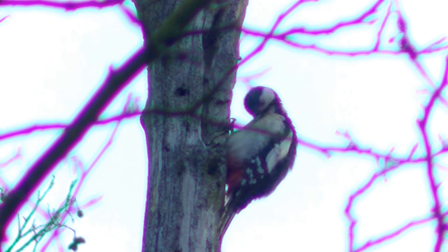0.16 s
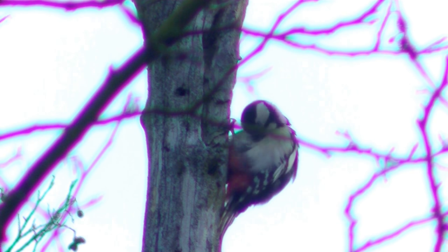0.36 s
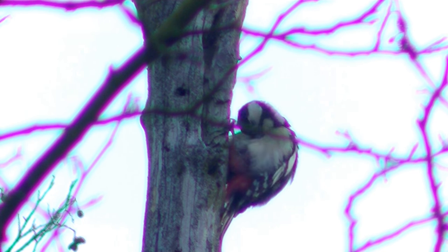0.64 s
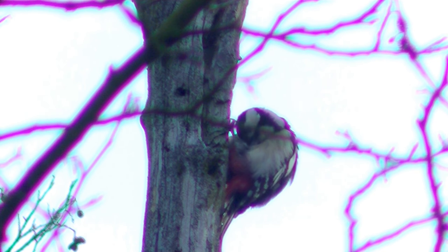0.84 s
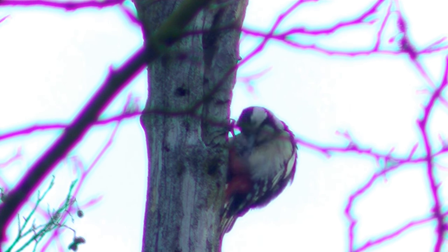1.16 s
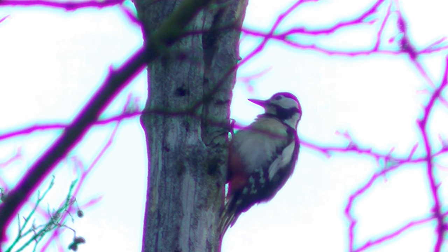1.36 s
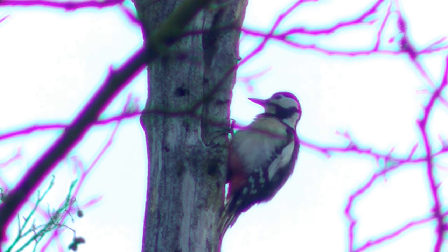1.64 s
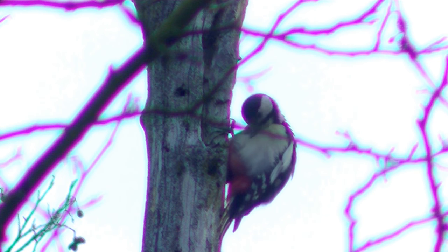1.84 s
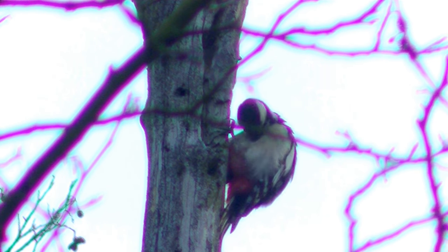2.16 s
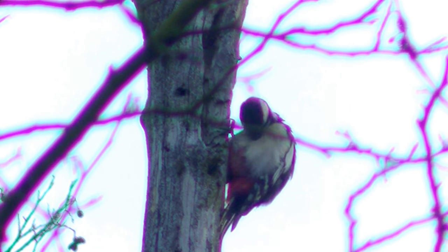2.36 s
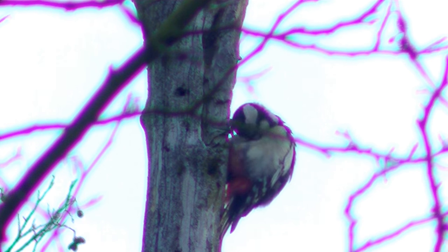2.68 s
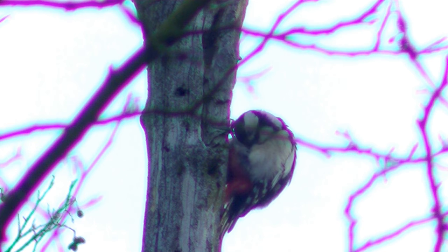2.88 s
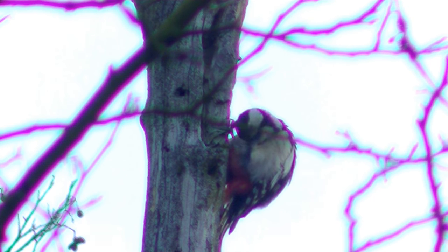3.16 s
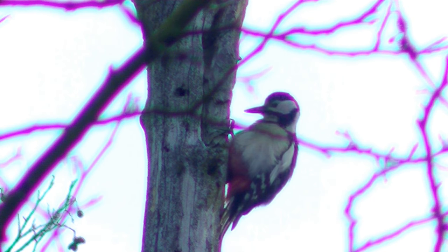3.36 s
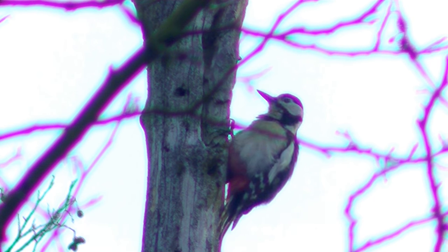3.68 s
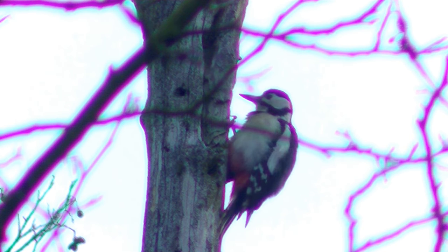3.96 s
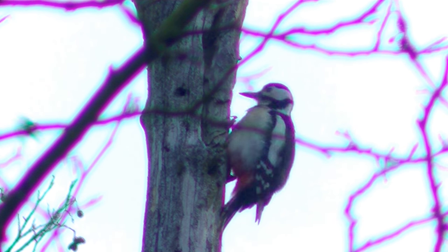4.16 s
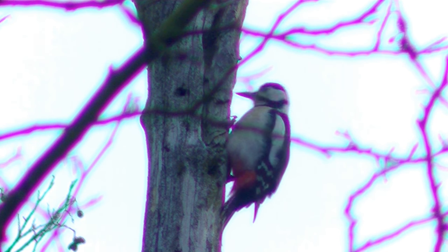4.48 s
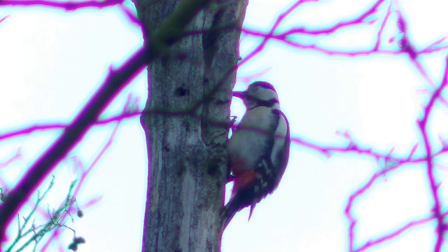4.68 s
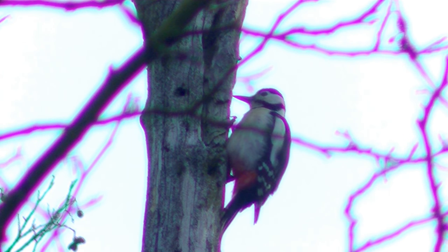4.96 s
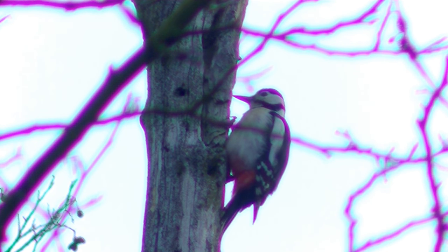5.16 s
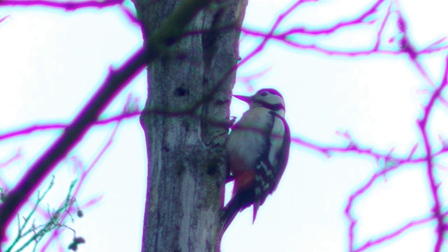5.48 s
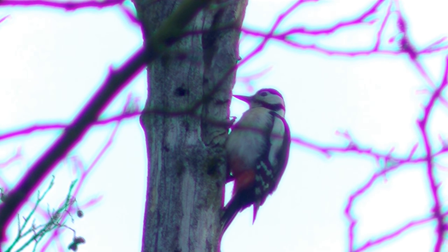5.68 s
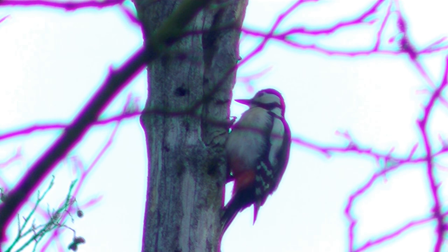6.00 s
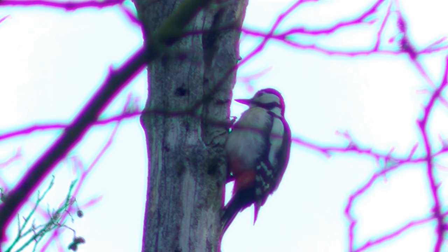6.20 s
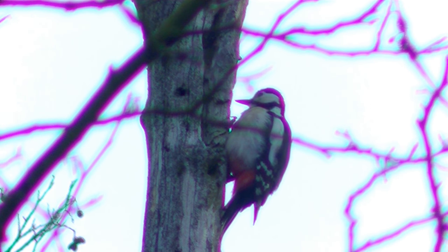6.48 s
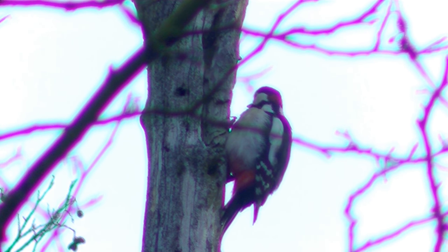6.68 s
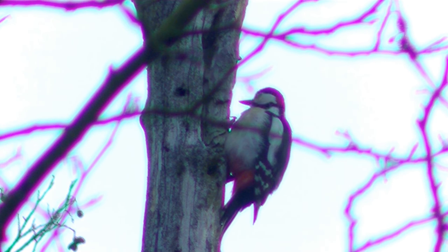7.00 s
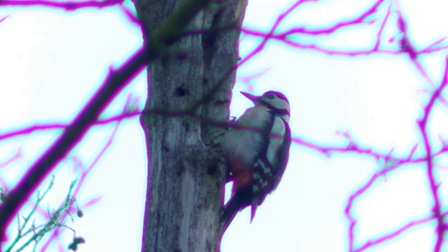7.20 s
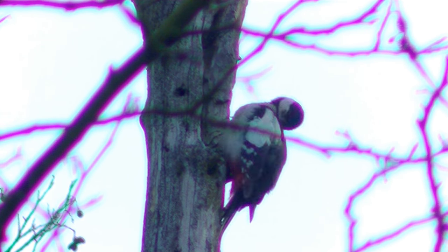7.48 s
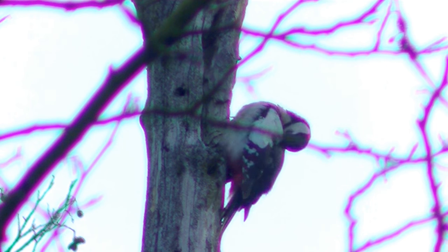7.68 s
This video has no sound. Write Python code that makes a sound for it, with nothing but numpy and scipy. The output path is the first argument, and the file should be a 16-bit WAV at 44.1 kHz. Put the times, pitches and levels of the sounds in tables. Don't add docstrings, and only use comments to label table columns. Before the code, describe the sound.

Songbirds pipe and chirp steadily among bare trees, with faint crows and doves far behind. After about four seconds a woodpecker hammers a single dry, resonant roll on dead wood, swelling quickly, speeding up slightly and dying away, answered by a low echo from afar. Quick buzzy trills and a second finch phrase follow, ending with harsh chips and a faint knock. Light hiss and a barely audible high whine remain throughout, picked up by a distant microphone.

```python
import sys
import numpy as np
from scipy import signal
from scipy.fft import rfft, irfft
from scipy.io import wavfile
from scipy.ndimage import uniform_filter1d

SR = 44100
rng = np.random.default_rng(int(sys.argv[2]) if len(sys.argv) > 2 else 0)


def unload_audio(sound):
    columns = np.transpose(np.atleast_2d(sound))
    steps = np.round(np.clip(columns, -1, 1) * 32767)
    wavfile.write(sys.argv[1], SR, steps.astype(np.int16))


def voltage_ratio(level):
    return 10 ** (np.asarray(level, float) / 20)


N = 345744

# time in seconds, peak level in dB.
BLOWS = [(4.2402, -27.8), (4.3072, -17.4), (4.3646, -13.5), (4.417, -13.1), (4.4677, -14.0),
         (4.5188, -14.6), (4.5668, -13.4), (4.6152, -14.0), (4.6619, -14.9), (4.7075, -15.7),
         (4.7508, -15.9), (4.7935, -19.2), (4.8313, -21.9), (4.87, -25.5), (4.9065, -25.4), (4.942, -30.0)]
# pitch in Hz, level in dB, time to fall 60 dB in seconds,
# time to swell in seconds.
TRUNK_MODES = [(300, -47.5, 0.12, 0.02), (511, -43.2, 0.045, 0.0126), (594, -46.6, 0.12, 0.0199),
               (665, -25.6, 0.065, 0.0152), (697, -33.2, 0.12, 0.02), (871, -22.4, 0.015, 0.0161),
               (910, -17.1, 0.08, 0.0036), (1036, -18.2, 0.021, 0.0102), (1178, -32.7, 0.091, 0.0182),
               (1213, -23.8, 0.096, 0.0124), (1298, -18.5, 0.018, 0.0091), (1382, -22.5, 0.087, 0.0015),
               (1528, -19.0, 0.104, 0.0064), (1622, -24.8, 0.08, 0.0032), (1703, -17.0, 0.067, 0.0017),
               (1896, -36.8, 0.12, 0.02), (2076, -26.7, 0.12, 0.0015), (2192, -18.8, 0.008, 0.0071),
               (2496, -19.0, 0.051, 0.0015), (2634, -21.5, 0.033, 0.0029), (2881, -32.8, 0.12, 0.0091),
               (2997, -30.4, 0.103, 0.0015), (3293, -37.1, 0.12, 0.0199), (3605, -30.0, 0.095, 0.002),
               (3818, -25.4, 0.017, 0.0044), (4248, -35.0, 0.072, 0.0015)]
KNOT_MODE = 1140, -29, .04, .006
HOLLOW_HZ = 735, 825
# time in seconds, peak level in dB.
FAR_BLOWS = [(1.1218, -53), (1.187, -52.5), (1.2286, -53), (1.2874, -50), (1.3539, -53), (1.403, -52),
             (1.4509, -49.5), (1.527, -56), (1.599, -56), (1.651, -62), (1.7045, -68)]
# time in seconds, peak level in dB.
FAR_KNOCKS = [
    (7.588, -23),
]
# time in seconds, level of the 2.4-4.5 kHz singers in dB,
# level of the higher singers in dB.
CHORUS_LEVELS = [(0.0, -44.5, -49), (0.41, -49, -49.5), (1.24, -44.5, -51), (1.9, -43.5, -42),
                 (2.36, -40.5, -48.5), (2.99, -42, -52), (3.52, -45, -43), (4.28, -45, -60),
                 (4.65, -47, -57), (5.02, -42.5, -49), (5.28, -42.5, -43.5), (6.53, -44, -52),
                 (7.55, -48, -53), (7.84, -48.5, -61)]
# pitch in Hz, level in dB per Hz.
CHORUS_COLOUR = [(1000, -53), (1700, -15.5), (2200, -5), (2500, -4.5), (3000, -2), (3400, 4.5), (3600, 5.5),
                 (3850, 5), (4250, 1), (4420, -7.5), (4600, -5), (6000, -30.5)]
# pitch in Hz, level in dB per Hz.
AIR_COLOUR = [(15, -66), (25, -39), (184, -29), (459, -10.5), (1150, -10), (1720, -12), (3110, -4.5),
              (3560, -8), (4180, -34), (4660, -25.5), (7370, -17), (7990, -18), (8660, -19.5),
              (13700, -23.5), (15700, -27.5)]
# pitch in Hz, level in dB per Hz.
PORT_COLOUR = [(15, -36), (25, -7), (168, -3.5), (540, 7.5), (1700, 0), (2950, -6), (3790, -53),
               (4880, -10), (6000, -38), (7800, -53), (13200, -120)]
WHINE = 7813.5, 13.3, -67.5
# pitch in Hz, time to fall 60 dB in seconds.
WOOD_T60 = [(300, 1.1), (1000, 2.18), (3000, 0.6), (8000, 1.02)]
# lag in seconds, level in dB.
NEAR_TRUNKS = [
    (.013, -15),
    (.024, -16),
    (.037, -18),
]

# start in seconds, length in seconds, first Hz, last Hz, level in dB.
BUZZES = [(1.5, .07, 5550, 4650, -53), (1.71, .055, 6300, 4500, -47), (1.755, .06, 4600, 2850, -45),
          (3.72, .07, 3900, 2750, -47), (7.66, .13, 3400, 3100, -50), (1.925, .09, 6450, 3700, -45),
          (3.335, .03, 5200, 6800, -58), (3.365, .03, 7000, 5200, -52), (3.435, .02, 6100, 5800, -54),
          (3.455, .03, 6000, 5000, -51), (3.49, .05, 5550, 4950, -58), (7.175, .02, 6300, 5750, -50),
          (7.195, .022, 6450, 5000, -48), (7.272, .015, 5600, 6800, -56), (7.292, .022, 6100, 5100, -47),
          (7.58, .02, 5050, 4900, -49), (7.592, .048, 4150, 2800, -39.5), (2.35, .065, 3600, 3200, -44),
          (1.755, .03, 4150, 3850, -45), (2.06, .04, 3900, 3200, -46), (6.335, .04, 2950, 2750, -46),
          (6.5, .04, 2850, 2900, -47), (7.41, .26, 7900, 7300, -58), (7.43, .27, 7200, 6780, -56)]
# start, length and gap between chips in seconds, middle Hz, level in dB.
TRILLS = [
    (.99, .43, .0695, 3200, -46),
    (1.025, .43, .0695, 3050, -48),
    (5.555, .14, .023, 3570, -36),
    (5.765, .06, .023, 3600, -35),
    (5.9, .06, .025, 3600, -38),
    (5.98, .05, .024, 4030, -36),
    (6.05, .05, .023, 3620, -36),
    (6.185, .045, .014, 3500, -32),
]
# seconds after the start, length in seconds, first, middle and last share of its Hz, dB.
TICK = (-.017, .013, 1.17, .96, .91, 0)
# seconds after the start, length in seconds, first Hz, middle Hz, last Hz, level in dB.
DIP = (.004, .016, 3520, 3180, 2720, 0)
DIP_HEAD = (-.002, .007, 3560, 3630, 3580, 0)
LIFT = (0, .044, 2800, 3500, 4120, -.5)
# seconds after the start, length in seconds, first Hz, middle Hz,
# last Hz, level in dB.
ENDING = [
    (0, .019, 2680, 3300, 3850, 0),
    (.022, .022, 3250, 2980, 2700, -2),
    (.052, .016, 3000, 3250, 3550, -6),
]
# start in seconds, wait for the lift in seconds, level in dB, tick Hz, tick dB.
SYLLABLES = [(2.349, .031, -37.5, 5200, -58), (2.496, .049, -36, 5400, -49),
             (2.657, .055, -35.5, 5400, -47), (2.824, .067, -37, 5400, -50), (3.001, .074, -36, 5050, -51),
             (3.184, .074, -38, 4700, -55), (6.317, .043, -38, 5700, -55), (6.483, .048, -39, 5300, -48),
             (6.646, .066, -35, 5350, -46), (6.831, .062, -39, 5300, -50), (7.003, .08, -37, 5000, -58)]
# start in seconds, level in dB.
ENDINGS = [
    (3.557, -37),
    (7.4, -38),
]
# seconds after the start, length in seconds, first Hz, middle Hz, last Hz, level in dB.
HOOK_RISE = (-.003, .015, 3150, 3850, 4240, -3.5)
# start in seconds, hold in seconds, level in dB.
HOOKS = [(.055, .05, -45), (.388, .035, -42), (.588, .034, -37), (.811, .03, -41), (2.062, .006, -43),
         (2.112, .012, -41), (2.153, .006, -44), (3.095, .025, -43), (3.382, .042, -43), (3.755, .03, -38),
         (4.062, .04, -43), (5.255, .03, -44)]
# start in seconds, length in seconds, Hz, level in dB.
HELD = [(.037, .03, 3500, -46), (.089, .08, 3500, -46), (.142, .018, 5150, -57), (.236, .012, 5150, -53),
        (.745, .08, 3570, -47), (.96, .03, 3570, -47), (1.157, .018, 3570, -40), (1.19, .055, 3600, -39),
        (1.255, .014, 3640, -41), (1.55, .06, 3570, -50), (1.83, .05, 3650, -50), (1.314, .027, 4330, -49),
        (1.354, .036, 4330, -47), (1.531, .038, 4830, -50), (1.615, .07, 3640, -39), (1.69, .05, 3690, -45),
        (1.8, .045, 4330, -47), (2.055, .09, 3640, -38), (2.487, .012, 4850, -54), (2.648, .013, 4860, -53),
        (3.752, .012, 3550, -40), (3.886, .014, 3500, -41), (4.328, .124, 3570, -50),
        (.808, .014, 3570, -41), (.885, .06, 4330, -50), (1.0, .06, 4310, -53), (.41, .11, 3650, -54),
        (2.742, .04, 4230, -43), (2.668, .028, 3550, -41), (2.94, .045, 3050, -47), (5.88, .03, 2800, -47),
        (4.762, .027, 3590, -44), (4.803, .075, 3600, -40), (4.923, .018, 4300, -45),
        (4.965, .026, 4300, -45), (4.995, .03, 3480, -45), (5.32, .07, 3550, -45), (5.523, .036, 4020, -37),
        (6.164, .025, 3870, -42), (6.318, .035, 5050, -54), (6.36, .022, 5050, -55),
        (6.795, .04, 4530, -46)]
# start in seconds, length in seconds, middle Hz, level in dB.
DROPS = [(.789, .011, 5660, -56), (1.261, .03, 5000, -57), (3.745, .022, 4700, -53),
         (3.862, .02, 3250, -43), (3.915, .027, 4950, -56), (3.985, .03, 3500, -46),
         (4.491, .015, 5050, -50), (4.51, .07, 3330, -47), (4.686, .011, 5300, -58),
         (4.77, .011, 5300, -56), (4.794, .013, 5150, -51), (5.826, .029, 5300, -54),
         (6.885, .012, 4000, -41)]
# start in seconds, length in seconds, top Hz, level in dB.
ARCHES = [
    (1.43, .035, 6200, -62),
    (6.743, .036, 6350, -51),
    (6.838, .046, 6540, -46),
    (6.95, .04, 6420, -57),
]
# start in seconds, length in seconds, first Hz, last Hz, level in dB.
GLIDES = [(1.656, .033, 5730, 6650, -56), (1.875, .04, 5530, 6890, -57), (2.698, .056, 6570, 6330, -62),
          (2.912, .022, 6400, 6250, -60), (.632, .022, 4250, 3950, -45), (0.0, .05, 3200, 3400, -55),
          (.17, .07, 3350, 3130, -55), (6.41, .045, 3350, 3250, -47), (7.703, .012, 2750, 3100, -45),
          (7.724, .014, 2800, 3500, -43), (6.9, .1, 4020, 3900, -51), (5.06, .1, 6750, 6250, -63),
          (7.12, .17, 4060, 3950, -54), (6.79, .043, 8850, 9150, -61), (6.885, .07, 6500, 6450, -60),
          (6.9, .033, 7400, 7180, -62), (7.43, .24, 7200, 6780, -61), (4.23, .01, 3150, 3550, -46),
          (4.242, .022, 3500, 3000, -46)]
# start in seconds, length in seconds, top Hz, level in dB.
CAWS = [
    (.04, .18, 1170, -60),
    (.96, .1, 1200, -61),
    (2.13, .19, 1190, -58.5),
    (2.43, .21, 1170, -63),
    (3.36, .14, 1200, -57),
    (7.47, .3, 1150, -68),
    (.33, .33, 445, -70),
]
# start in seconds, length in seconds, first Hz, last Hz, level in dB.
COOS = [(1.75, .25, 552, 550, -71), (2.25, .07, 520, 550, -68), (2.31, .24, 535, 425, -66),
        (2.44, .2, 548, 545, -69), (3.0, .22, 542, 532, -68), (3.36, .2, 445, 418, -67),
        (.4, .2, 2430, 2100, -58), (.6, .1, 2200, 2480, -61), (.95, .12, 2050, 1900, -61),
        (0.0, .08, 2130, 2260, -56), (.07, .06, 2650, 3100, -53), (5.29, .1, 1995, 1960, -52),
        (5.398, .04, 1990, 1960, -44), (5.45, .11, 1985, 1990, -58), (7.55, .15, 1730, 1610, -60),
        (7.74, .065, 2020, 2010, -46), (7.805, .06, 1990, 1990, -44.5), (2.034, .015, 1950, 1250, -45),
        (7.04, .14, 1950, 1900, -61)]

CRACK_S = .0048


def unit(x):
    return x / np.sqrt(np.mean(x ** 2) + 1e-20)


def at_hz(points, hz):
    table_hz, value = np.array(points)[:, 0], np.array(points)[:, 1]
    return np.interp(np.log(np.maximum(hz, 1)), np.log(table_hz), value)


def coloured(x, spectrum):
    hz = np.fft.rfftfreq(len(x), 1 / SR)
    return unit(irfft(rfft(x) * voltage_ratio(at_hz(spectrum, hz)), len(x)))


def drift(rate, size=N):
    knots = rng.standard_normal(int(N / SR * 400) + 9)
    return np.interp(np.arange(size) / SR * rate, np.arange(len(knots)), knots)


def band(x, low_hz, high_hz):
    return signal.sosfilt(signal.butter(2, [low_hz, high_hz], "band", fs=SR, output="sos"), x)


def delayed(x, lag_s):
    lag = round(lag_s * SR)
    return np.r_[np.zeros(lag), x[:len(x) - lag]]


def add(out, note, rough, flutter_hz, peak):
    s, length, first, middle, last, db = note
    u = np.arange(int(length * 1.2 * SR)) / (length * SR) - .1
    hz = first + (4 * middle - 3 * first - last) * u + 2 * (first + last - 2 * middle) * u ** 2
    shape = np.sin(np.pi * np.clip((u + .1) / 1.2, 0, 1)) ** peak
    flutter = np.interp(np.arange(len(u)) / SR * flutter_hz, np.arange(600), rng.standard_normal(600))
    rough = np.clip(rough, 0, 1)
    level = voltage_ratio(db) * shape * (1 - rough + rough * flutter)
    wave = level * np.sin(2 * np.pi * np.cumsum(hz) / SR)
    i = round((s - .1 * length) * SR)
    wave = wave[max(-i, 0):N - i]
    out[max(i, 0):max(i, 0) + len(wave)] += wave


def whistles(notes, gain_db, rough, flutter_hz):
    out = np.zeros(N)
    for note in notes:
        add(out, note, rough, flutter_hz, peak=.5)
    return voltage_ratio(gain_db) * out


def figures(rows, parts):
    return [(s + after, length, first, middle, last, db + part_db)
            for s, db in rows
            for after, length, first, middle, last, part_db in parts]


def bent(rows, first, last):
    return [(s, length, first * hz, hz, last * hz, db) for s, length, hz, db in rows]


def straight(rows):
    return [(s, length, first, (first + last) / 2, last, db) for s, length, first, last, db in rows]


def hiss():
    air = voltage_ratio(-53.5) * coloured(rng.standard_normal(N), AIR_COLOUR)
    ports = voltage_ratio(-66) * coloured(rng.standard_normal(N), PORT_COLOUR)
    return air + ports * np.array([[1], [-1]])


def electronic_whine():
    t = np.arange(N) / SR
    hz, flips, db = WHINE
    tone = np.sin(2 * np.pi * hz * t + .4 * drift(8.0))
    return voltage_ratio(db + 3) * tone * np.tanh(4 * np.sin(2 * np.pi * flips * t))


def chorus():
    s, low_db, high_db = np.transpose(CHORUS_LEVELS)
    t, out = np.arange(N) / SR, np.zeros(N)
    for when, pitch, bend, length, db in rng.random((1500, 5)):
        hz = 1900 * 3.2 ** pitch
        first, last = hz * (1.03 - .06 * bend), hz * (.97 + .06 * bend)
        note = (when * N / SR, .008 + .06 * length ** 3, first, hz, last, 6 * db)
        add(out, note, rough=.5, flutter_hz=300, peak=1.2)
    twitter = unit(out) + voltage_ratio(12) * rng.standard_normal(N)
    low = coloured(twitter, CHORUS_COLOUR) * voltage_ratio(1.2 * drift(9.0))
    high = unit(band(twitter, 4600, 6200)) * voltage_ratio(1.5 * drift(14.0))
    return low * voltage_ratio(np.interp(t, s, low_db) - 2.5) + high * voltage_ratio(np.interp(t, s, high_db) - 15.0)


def birds():
    ticks, song = finch()
    hooked, tails = hooks()
    thin = ticks + straight(GLIDES) + bent(ARCHES, .85, .85)
    full = hooked + bent(HELD, .992, .992) + bent(DROPS, 1.09, .91)
    far = bent(CAWS, .9, .9) + straight(COOS)
    high = whistles(thin, gain_db=4.5, rough=.15, flutter_hz=250)
    middle = whistles(full, gain_db=3.5, rough=.28, flutter_hz=450)
    near = whistles(song, gain_db=4.5, rough=.26, flutter_hz=350)
    middle += near + sum(voltage_ratio(db) * delayed(near, lag) for lag, db in NEAR_TRUNKS)
    middle += whistles(tails, gain_db=3.0, rough=.7, flutter_hz=90)
    middle += whistles(trills(), gain_db=-2.5, rough=.16, flutter_hz=266)
    buzz = whistles(straight(BUZZES), gain_db=5.5, rough=.8, flutter_hz=1500)
    low = whistles(far, gain_db=2.5, rough=.18, flutter_hz=60)
    return high + buzz, middle + low


def trees(x):
    t = np.arange(int(1.2 * SR)) / SR
    white, tail = rng.standard_normal((2, len(t))), 0
    for low in 250 * 2. ** np.arange(6):
        tail = tail + band(white, low, 1.985 * low) * voltage_ratio(-60 * t / at_hz(WOOD_T60, 1.16 * low))
    tail = tail * (1 + voltage_ratio(16.5) * voltage_ratio(-60 * t / 0.12)) * np.clip(t / 0.004, 0, 1)
    spectrum = rfft(tail)
    fine, broad = (uniform_filter1d(abs(spectrum) ** 2, size) for size in (12, 400))
    tail = irfft(spectrum * np.sqrt(broad / fine), len(t))
    tail = tail * np.clip((1.1 - t) / .3, 0, 1)
    tail = tail / np.sqrt(np.sum(tail[0] ** 2))
    mid, side = signal.fftconvolve(x[None], tail, axes=1)[:, :N]
    return mid + voltage_ratio(-22.5) * side * np.array([[1], [-1]])


def hooks():
    rises = figures([(s, db) for s, _, db in HOOKS], [HOOK_RISE])
    tops = [(s + 0.012, hold, 4280, db - 1.0) for s, hold, db in HOOKS]
    tails = [(s + hold, .12, hz, db - 10) for s, hold, hz, db in tops]
    return rises + bent(tops, .965, .985), bent(tails, .99, .98)


def trills():
    chip_share, fall_per_s, spread_db, longest_s = .45, 3.8, 2.5, .02
    notes, chance = [], rng.standard_normal((len(TRILLS), 8, 2))
    for (s, length, gap, hz, db), draws in zip(TRILLS, chance):
        chip_s = chip_share * gap
        fall = fall_per_s * chip_s
        chips = [(s + k * gap, min(chip_s, longest_s), hz * (1 + .02 * pitch), db + spread_db * level)
                 for k, (pitch, level) in enumerate(draws) if k * gap <= length]
        notes += bent(chips, 1 + fall, 1 - fall)
    return notes


def blow(grain):
    t = np.arange(len(grain)) / SR
    modes = TRUNK_MODES + [KNOT_MODE]
    chance = rng.standard_normal((len(modes), 2))
    out = voltage_ratio(-39) * np.exp(-((t - CRACK_S) / 0.00054) ** 2)
    for (hz, db, t60, swell), (level, phase), spot in zip(modes, chance, grain):
        build = np.sin(np.pi / 2 * np.clip(t / max(swell, .001), 0, 1))
        ring = np.cos(2 * np.pi * hz * (t - CRACK_S) + .14 * phase + .2 * spot)
        lift_db = 1.2 * (hz < 720)
        fall_db = 60 * np.maximum(t - swell, 0) / t60
        out = out + build * voltage_ratio(db + lift_db + .7 * level - fall_db) * ring
    shared = .95
    noise = shared * grain + np.sqrt(1 - shared ** 2) * rng.standard_normal(len(t))
    crack = noise * np.exp(-((t - CRACK_S) / .0018) ** 2)
    out = out + voltage_ratio(-15) * band(band(crack, 2600, 5200), 2600, 5200)
    thud = noise * np.clip(t / 0.0022, 0, 1) * voltage_ratio(-13 - 60 * t / .04)
    out = out + band(thud, 850, 2200)
    out = signal.sosfilt(signal.butter(1, 160, "high", fs=SR, output="sos"), out)
    early = np.r_[out[3:], 0, 0, 0]
    out = signal.sosfilt(signal.butter(4, 5000, fs=SR, output="sos"), early)
    return out / out.max()


def strikes(rows, gain_db):
    out, grain = np.zeros(N + SR), rng.standard_normal(int(.2 * SR))
    for s, db in rows:
        knock, i = blow(grain), round((s - CRACK_S) * SR)
        out[i:i + len(knock)] += voltage_ratio(db + gain_db) * knock
    return out[:N]


def far_drummer():
    roll = band(strikes(FAR_BLOWS, gain_db=11.5), 530, 1360)
    return roll + band(strikes(FAR_KNOCKS, gain_db=-15.0), 1070, 1500)


def finch():
    after, length, first, middle, last, _ = TICK
    ticks = [(s + after, length, first * hz, middle * hz, last * hz, db) for s, _, _, hz, db in SYLLABLES]
    dips = figures([(s, db) for s, _, db, _, _ in SYLLABLES], [DIP])
    soon = [(s, db) for s, wait, db, _, _ in SYLLABLES if wait < .0665]
    dips += figures(soon, [DIP_HEAD])
    lifts = [(s + wait, LIFT[1] - .25 * wait, *LIFT[2:5], db + LIFT[5]) for s, wait, db, _, _ in SYLLABLES]
    return ticks, dips + lifts + figures(ENDINGS, ENDING)


def sideways_drum(drum):
    return band(uniform_filter1d(abs(drum), size=90) * rng.standard_normal(N), 800, 2450)


def slope_echo(drum):
    lag_s, level_db, fade_db_per_s = .659, -11.5, 7
    since = (np.arange(N) / SR - BLOWS[0][0] - lag_s).clip(0)
    return voltage_ratio(level_db - fade_db_per_s * since) * band(delayed(drum, lag_s), 530, 655)


def scene():
    background = hiss() + electronic_whine() + chorus()
    thin, full = birds()
    far = far_drummer()
    drum = strikes(BLOWS, gain_db=.4)
    echo = slope_echo(drum)
    sent = voltage_ratio(-9) * band(drum, 600, 3000) + voltage_ratio(4.5) * sideways_drum(drum) + voltage_ratio(-8) * echo
    sent = signal.sosfilt(signal.butter(2, HOLLOW_HZ, "bandstop", fs=SR, output="sos"), sent)
    wet = trees(sent + voltage_ratio(3.0) * far + voltage_ratio(-3.0) * thin + voltage_ratio(-0.5) * full)
    thin_sides = thin * voltage_ratio([[-.6], [.6]])
    return drum + echo + far + thin_sides + full + wet + background


def band_limit(x):
    return signal.sosfilt(signal.butter(12, 15820, fs=SR, output="sos"), x)


def record(dry):
    return band_limit(dry)


dry = scene()
out = record(dry)
unload_audio(out)
```